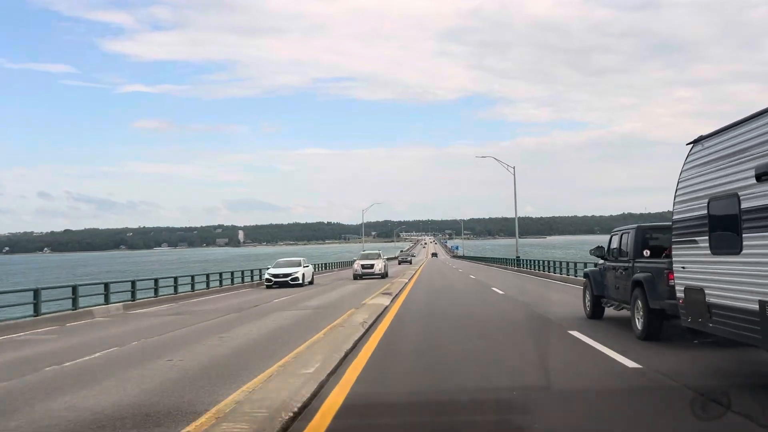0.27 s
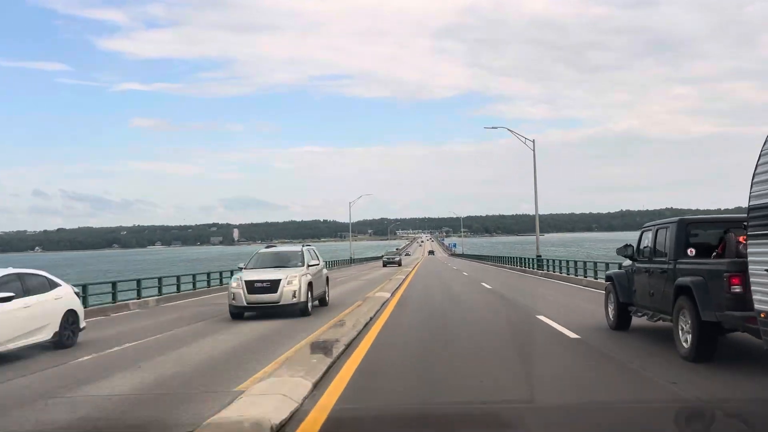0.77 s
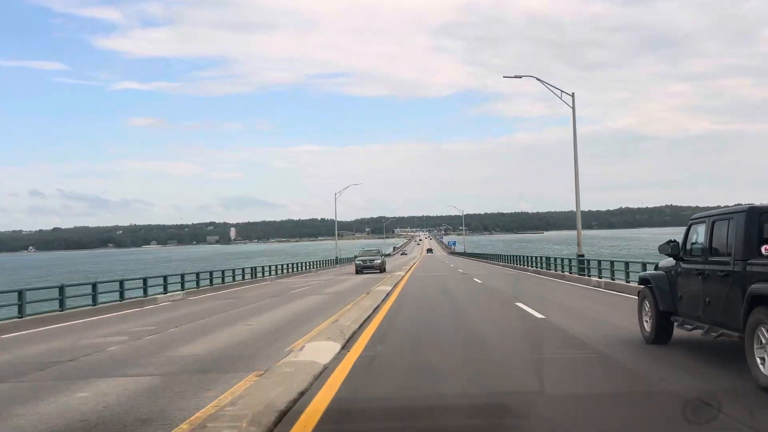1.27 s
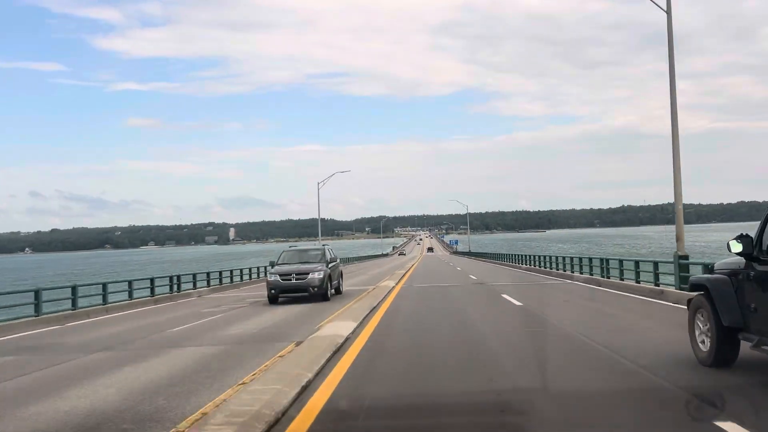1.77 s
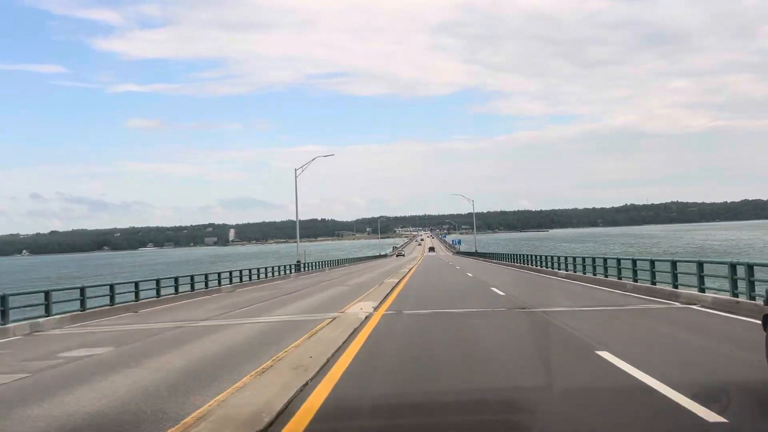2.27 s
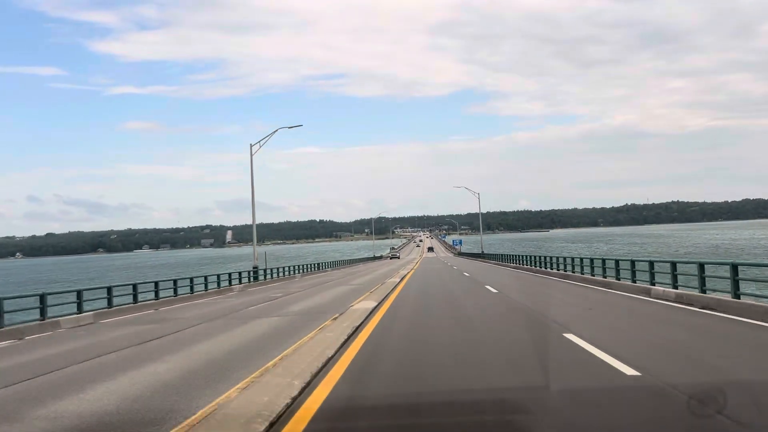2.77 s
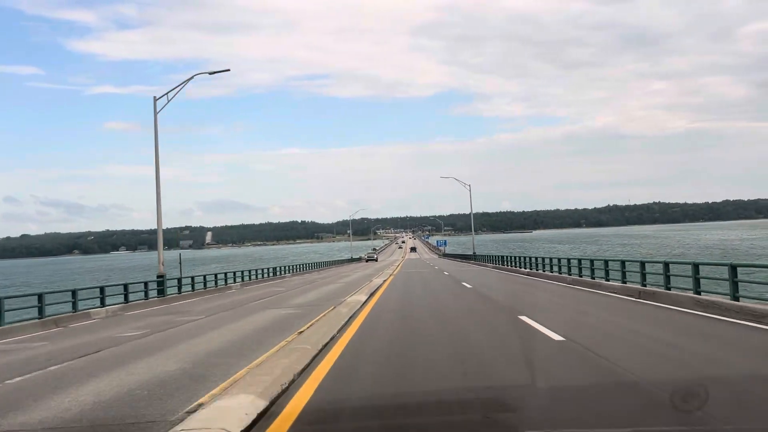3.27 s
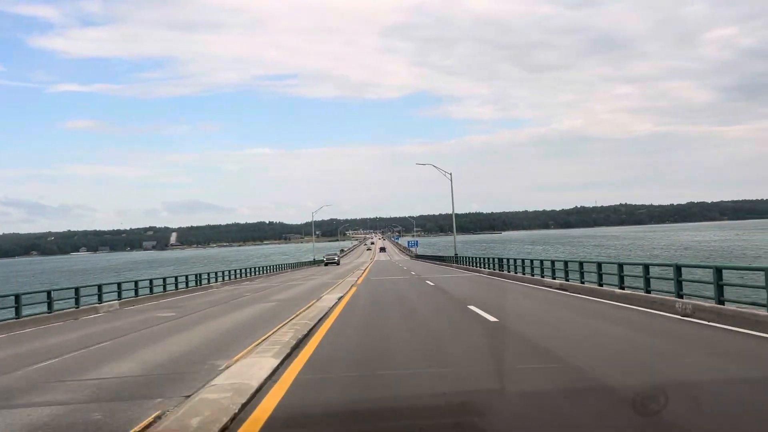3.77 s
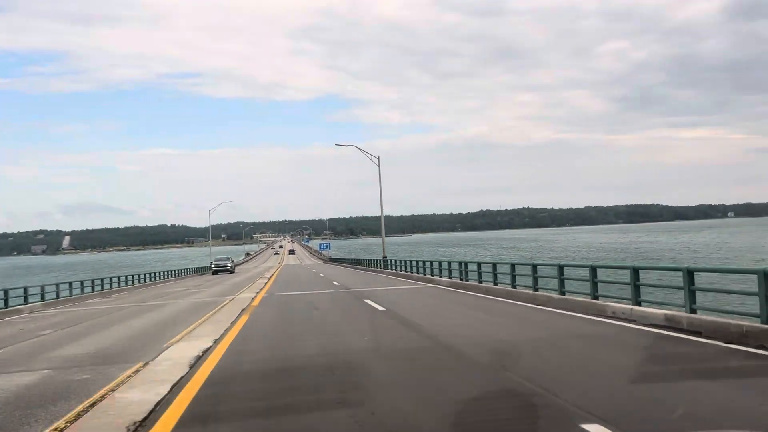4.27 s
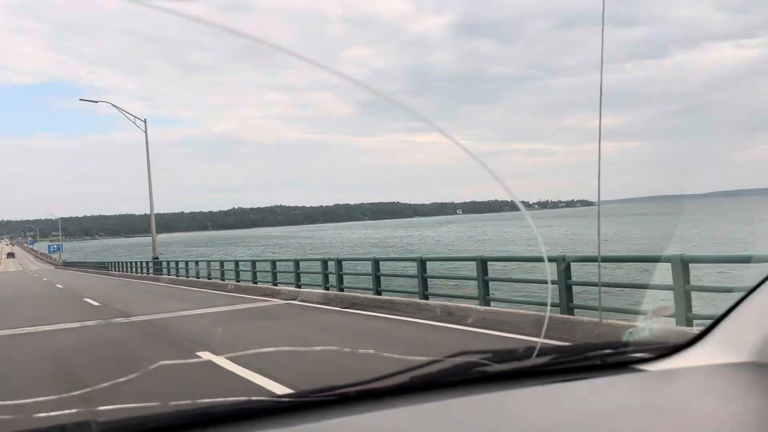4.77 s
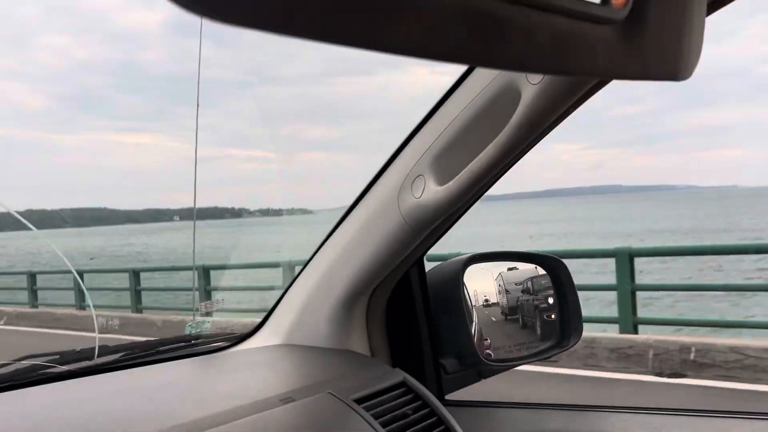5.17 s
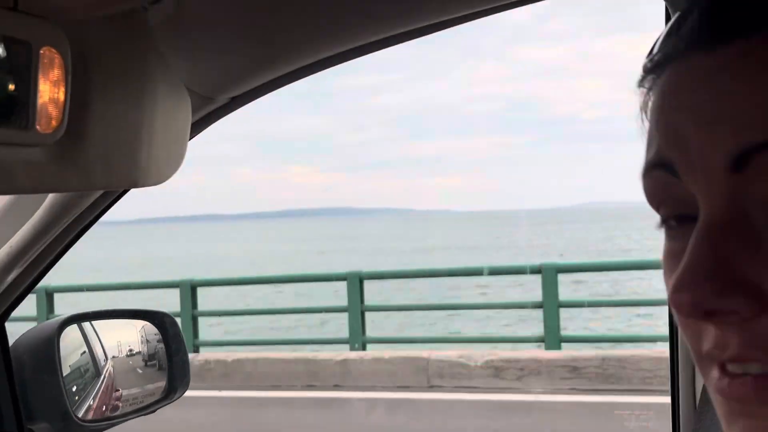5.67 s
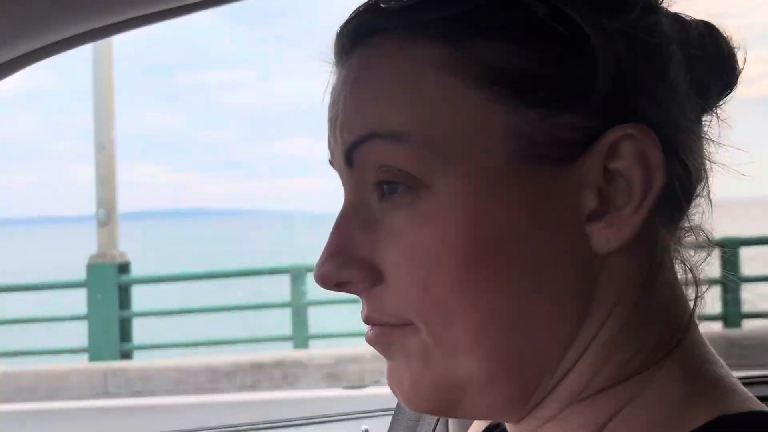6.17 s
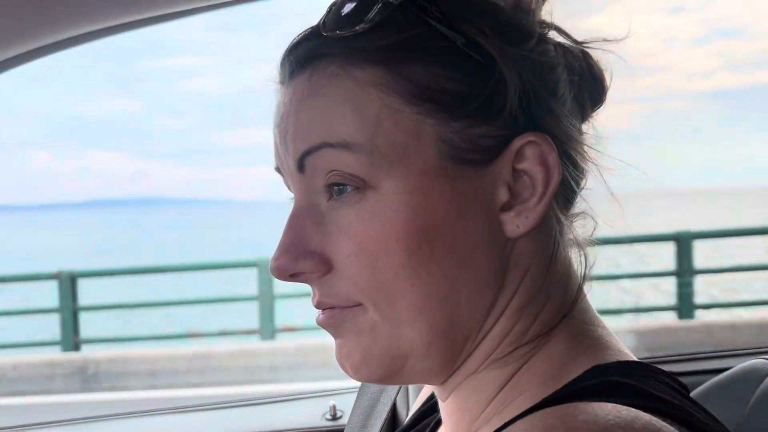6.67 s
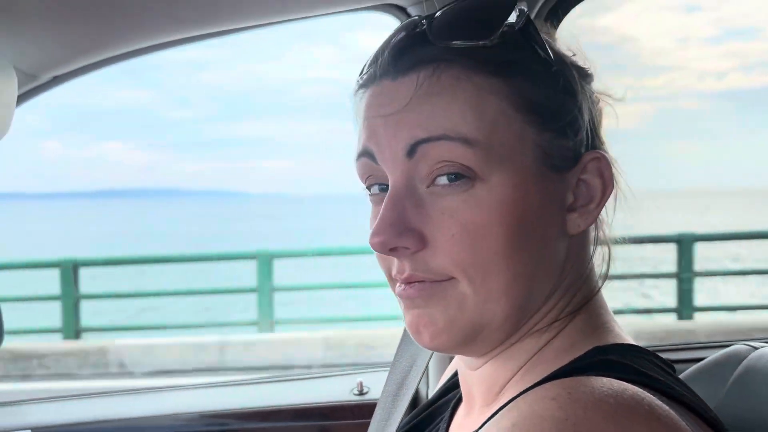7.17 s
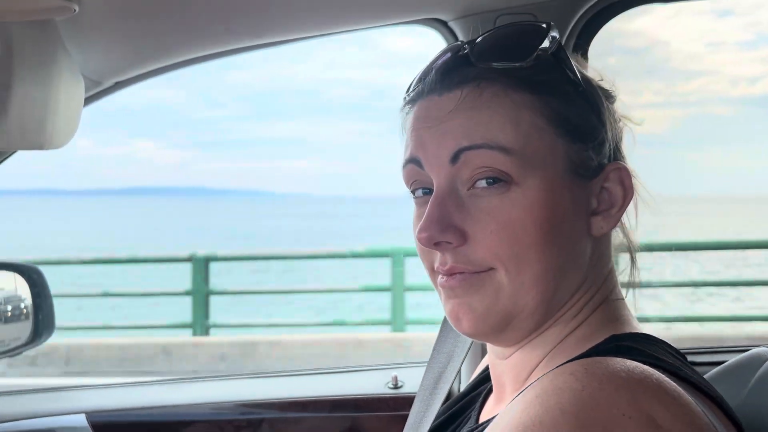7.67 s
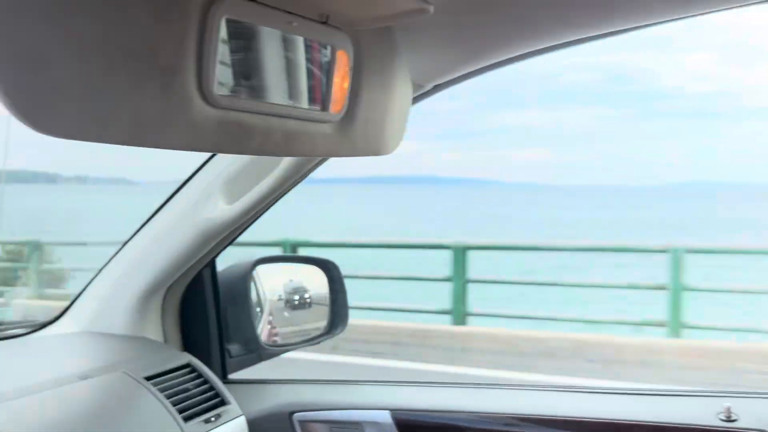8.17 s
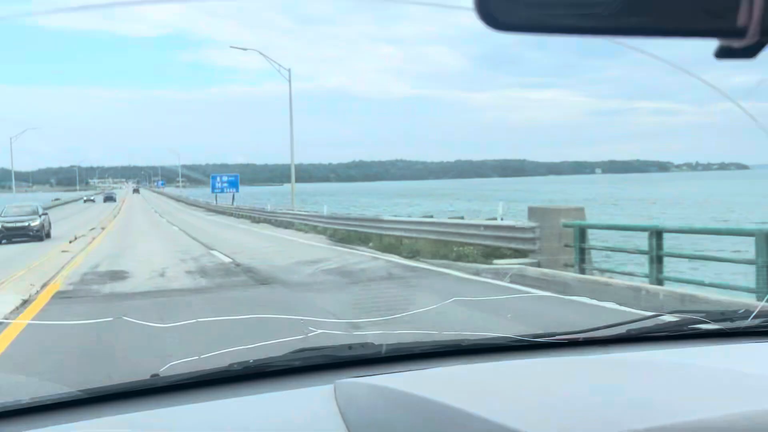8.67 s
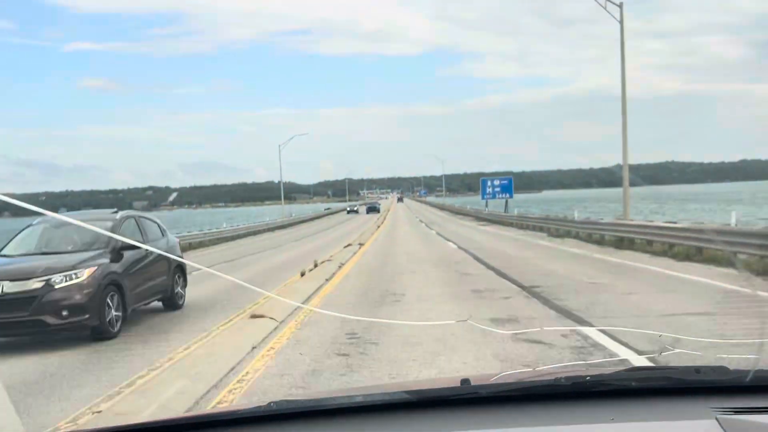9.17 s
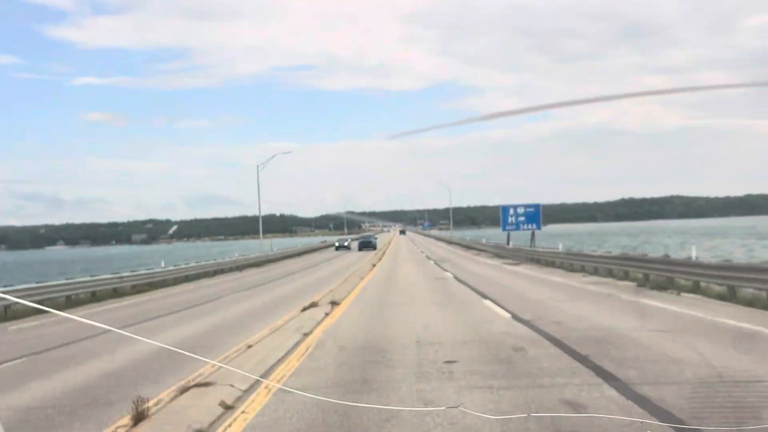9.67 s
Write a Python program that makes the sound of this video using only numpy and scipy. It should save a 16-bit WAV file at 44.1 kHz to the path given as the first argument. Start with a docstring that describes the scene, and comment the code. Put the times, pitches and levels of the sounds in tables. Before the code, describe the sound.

Heard inside a moving car on a bridge: a continuous deep boom and tyre roar with soft hiss and faint wind. Quick double thumps mark deck joints about every two and a half seconds, with slight panel rattle. Oncoming cars swish past early, midway and near the end. The hand-held phone turns into the cabin midway, where the roar eases and trim ticks, then turns partly back before a cluster of rough bumps.

```python
"""Inside a car crossing a long bridge at steady speed, heard by a hand-held phone with two microphone ports.
From the start the road shakes the body into a boom, tyres roar and hiss, and wind rushes at the glass, all as
coloured noise; both axles thump as damped modes over four deck joints, oncoming cars swish past as swells of
noise, and bands of noise, some broad, briefly swell and fade. Midway the phone turns from the windscreen to the
cabin and trim ticks; later it turns partly back, and near the end rough patches thump close together."""
import sys
import numpy as np
from scipy import signal
from scipy.fft import rfft, irfft, next_fast_len
from scipy.io import wavfile
from scipy.ndimage import uniform_filter1d, map_coordinates

SR = 44100
rng = np.random.default_rng(int(sys.argv[2]) if len(sys.argv) > 2 else 0)


def inscribe(sig):
    """Save sig as 16-bit PCM at rate SR to the path in sys.argv[1].

    A 1-D sig is mono; a 2-D sig holds one channel per row.
    Samples are clipped to [-1, 1] before scaling.
    """
    pcm = np.round(np.clip(np.atleast_2d(sig).T, -1, 1) * 32767)
    wavfile.write(sys.argv[1], SR, pcm.astype(np.int16))


N = 437031


def amp(db):
    """Decibels to an amplitude ratio."""
    return 10 ** (np.asarray(db) / 20)


def unit(x):
    """Scaling to a root mean square of 1."""
    return x / np.sqrt(np.mean(x ** 2) + 1e-20)


def along(points, hz):
    """Columns of (Hz, value, ..) rows interpolated on a log frequency axis."""
    f, *cols = np.transpose(points)
    return np.squeeze([np.interp(np.log(hz + 1), np.log(f + 1), c) for c in cols])


def curves(rows):
    """Linear interpolation in time: one value per sample for each column after the time."""
    s, *cols = np.transpose(rows)
    return [np.interp(np.arange(N) / SR, s, c) for c in cols]


def wobble(rate):
    """A smooth random curve through rate knots a second."""
    knots = rng.standard_normal(int(N * rate / SR) + 4)
    return map_coordinates(knots, [np.arange(N) * rate / SR])


def filtered(x, response):
    """Linear filtering: the spectrum of x times a response of frequency."""
    n = x.shape[-1]
    m = next_fast_len(n + 8192)
    return irfft(rfft(x, m) * response(np.fft.rfftfreq(m, 1 / SR)), m)[..., :n]


def place(out, sound, s):
    """Superposition: a sound is added from s seconds on."""
    out[:, round(s * SR):][:, :sound.shape[-1]] += sound


def rush(spectrum, size=N, tilt_db=0):
    """Two unrelated noises of one colour, rms 1: the direct field and the scattered one."""
    def colour(hz):
        return amp(along(spectrum, hz) + tilt_db * np.log2((hz + 1) / 1000))
    return unit(filtered(rng.standard_normal((2, size)), colour))


def ring(modes, t, rise, tilt_db=0, pitch=1):
    """Damped modes at slightly random strengths and pitches, swelling in over rise seconds."""
    t = np.maximum(t, 0)
    total = 0
    for hz, db, t60 in modes:
        # the tilt, in dB per octave, pivots on the second mode
        level_db = db + tilt_db * np.log2(hz / modes[1][0]) + rng.normal(0, 0.3)
        heard_hz = pitch * hz * rng.normal(1, 0.029)
        total = total + amp(level_db - 60 * t / t60) * np.sin(2 * np.pi * heard_hz * t)
    return total * (1 - np.exp(-t / rise))


def road():
    """Broadband excitation: road texture drives body, tyres and tread; its grain and gusts make levels flutter."""
    # What reaches the phone. Each row: time in seconds, then levels in dB of tyre roar, wind, deep boom,
    # tread hiss and floor drone.
    levels = [(0.0, -22.5, -42.5, -18.5, -37, -21.5), (0.5, -21, -41, -24.5, -36, -20),
              (0.88, -22.5, -40, -17, -35.5, -21.5), (1.24, -21.5, -42, -19.5, -37, -25),
              (1.6, -22, -40.5, -18.5, -36, -23), (2.01, -21.5, -41.5, -19.5, -36, -24),
              (3.12, -24.5, -43, -22, -39, -24), (3.97, -24, -44, -19, -39, -26),
              (4.55, -24.5, -44.5, -21, -37.5, -27.5), (4.97, -28.5, -49, -27, -39, -25.5),
              (5.52, -27, -51.5, -22.5, -39, -23.5), (6.29, -29, -52.5, -25.5, -40.5, -24.5),
              (7.31, -28.5, -52, -24, -39, -24.5), (7.62, -28, -51, -26, -37.5, -24.5),
              (7.86, -27, -50.5, -28, -37.5, -22), (8.09, -26.5, -50.5, -24, -39, -20.5),
              (8.58, -26.5, -45, -32, -35.5, -20.5), (9.24, -24, -46, -21.5, -38.5, -20.5),
              (9.91, -24, -46, -22, -36.5, -26)]
    # Colours of the five noises. Each row: frequency in Hz, relative spectral density in dB.
    boom_colour = [(15, -48), (24, -21), (32, -21.5), (42, 2.5), (55, -0.5), (70, -2), (100, -27),
                   (200, -71)]
    drone_colour = [(30, -41.5), (55, -6.5), (78, -0.5), (95, -2.5), (118, -2.5), (140, -12.5), (200, -31),
                    (400, -66.5)]
    roar_colour = [(60, -52), (110, -10), (150, 0), (190, -1), (250, -4.5), (370, -9.5), (550, -11),
                   (800, -15.5), (1200, -22.5), (2000, -50.5), (5000, -72)]
    tread_colour = [(300, -46), (600, -18), (1000, -2), (1500, 1.5), (2100, -2.5), (2700, -7.5),
                    (3300, -16.5), (4500, -33.5), (9000, -41.5)]
    wind_colour = [(1200, -40), (2500, 4.5), (3500, 0.5), (4500, -2.5), (5800, -1), (6700, -6.5),
                   (8000, -7.5), (10000, -10.5), (13000, -11), (16000, -16)]
    swell_db, swell_rate = 0.87, 4.9  # slow random swell of boom and drone: depth in dB, knots a second
    roar_db, wind_db, boom_db, tread_db, drone_db = curves(levels)
    grain, gust = wobble(18), wobble(8)
    boom = amp(boom_db + swell_db * wobble(swell_rate)) * rush(boom_colour)
    drone = amp(drone_db + swell_db * wobble(swell_rate)) * rush(drone_colour)
    roar = amp(roar_db + 0.92 * grain) * rush(roar_colour)
    tread = amp(tread_db + 0.34 * grain + 0.47 * gust) * rush(tread_colour)
    wind_db = wind_db + 0.31 * grain + 0.37 * wobble(24) + 0.28 * gust
    return boom + drone + roar + tread + amp(wind_db) * rush(wind_colour)


def clack(db, scuff_db, t):
    """Dry contact of tread on an edge: impact modes make a solid knock, friction a short scuff."""
    # Steel lip of a joint. Each row: frequency in Hz, level in dB, 60 dB decay time in seconds.
    edge_modes = [(528, -3.5, 0.022), (804, -4.5, 0.066), (1200, -3, 0.024), (1530, 1.5, 0.021),
                  (2100, -3, .02)]
    # Colour of the scuff. Each row: frequency in Hz, relative spectral density in dB.
    scuff_colour = [(200, -25.5), (420, -1.5), (700, 0), (1300, 5), (2300, -6), (3000, -20), (8000, -45)]
    scuff = amp(scuff_db - 60 * t / 0.1) * (1 - np.exp(-t / 0.003)) * rush(scuff_colour, size=len(t))
    knock = ring(edge_modes, t, rise=0.00067) * [[1], [.4]]  # direct, scattered
    return amp(db) * (knock + scuff)


def rattle(db, t):
    """Repeated loose contact: panels and trim buzz on, in uneven grains, after a blow."""
    # Trim shaken by a joint. Each row: frequency in Hz, relative spectral density in dB.
    trim_colour = [(150, -29.5), (300, 1), (500, 4.5), (800, -1.5), (1300, -16), (2200, -21.5), (4000, -38)]
    rise_s, t60_s = .025, 0.4
    grain_db = 3.5 * wobble(91)[:len(t)]
    envelope = amp(db + grain_db - 60 * t / t60_s) * (1 - np.exp(-t / rise_s))
    return envelope * rush(trim_colour, size=len(t))


def wheel_blow(t, slap_db, thump_db, shudder_db, clack_db, stiff_db, lag, pitch, scuff_db):
    """Delayed transmission: the tyre slaps; the blow climbs the suspension into floor and cabin air."""
    # Three sets of modes. Each row: frequency in Hz, level in dB, 60 dB decay time in seconds.
    slap_modes = [(210.3, 1.5, 0.073), (268, -2.5, 0.039), (439, -9.5, 0.065)]  # air in the tyre and wheel arch
    thump_modes = [(76.5, 9, 0.21), (95, -6.5, 0.15), (123.7, -1, 0.15)]  # floor pan
    shudder_modes = [(43.6, -1.5, 0.42), (63, 1.5, 0.13)]  # cabin air and suspension
    shudder_lag_s = 0.0403  # floor to cabin air
    slap = amp(slap_db) * ring(slap_modes, t, rise=0.0031, pitch=pitch)
    thump = amp(thump_db) * ring(thump_modes, t - lag, rise=0.015, tilt_db=stiff_db)
    shudder = amp(shudder_db) * ring(shudder_modes, t - lag - shudder_lag_s, rise=0.032)
    return (slap + thump + shudder) * [[1], [.7]] + clack(clack_db, scuff_db, t)  # direct, scattered


def joints():
    """Successive impacts: each axle strikes the near lip of a deck gap, then the far one."""
    # Deck joints. Each row: front axle time in seconds, slap, front thump, rear thump, rear shudder, clack and
    # near-lip clack in dB, stiffness in dB per octave, front tyre to floor in seconds, slap pitch ratio,
    # rattle in dB, rear clack over front in dB, rear tyre to floor in seconds, scuff over clack in dB.
    crossings = [(.414, -8.5, -10.5, -12.5, -2, -31, -35, -11, 0.042, .8, -20.5, -8, 0.0044, -2.5),
                 (2.862, -6, -4, -6, -11, -22.5, -31, 6, .017, 1.01, -17.5, -4.5, 0.0028, -2),
                 (5.337, -10.5, -6.5, -10.5, -3.5, -15, -20.5, 3.5, 0.024, 1.12, -25.5, -6.5, 0.0264, -4),
                 (7.829, -10, -9.5, -8, -4.5, -29.5, -26.5, 6, 0.023, 0.99, -28, -4.5, 0.023, 4)]
    axle_gap_s, lip_gap_s = .13, 0.021  # front to rear axle; near lip to far lip
    front_shudder_db = -11  # over the front thump
    rear_slap_db, rear_stiff_db, rear_pitch = -2, 4, .9  # dB, dB per octave and ratio over the front axle
    out, t = np.zeros((2, N + SR)), np.arange(SR // 2) / SR
    for (s, slap_db, front_db, rear_db, shudder_db, clack_db, lip_db, stiff_db, lag, pitch,
         rattle_db, rear_clack_db, rear_lag, scuff_db) in crossings:
        rear_s = s + axle_gap_s
        for axle_s, axle_db in [(s, 0), (rear_s, rear_clack_db)]:
            place(out, clack(lip_db + axle_db, scuff_db, t), axle_s - lip_gap_s)
            place(out, rattle(rattle_db + axle_db / 2, t), axle_s)
        front = wheel_blow(t, slap_db, front_db, front_db + front_shudder_db, clack_db,
                           stiff_db, lag, pitch, scuff_db)
        rear = wheel_blow(t, slap_db + rear_slap_db, rear_db, shudder_db, clack_db + rear_clack_db,
                          stiff_db + rear_stiff_db, rear_lag, rear_pitch * pitch, scuff_db)
        place(out, front, s)
        place(out, rear, rear_s)
    return out[:, :N]


def patches():
    """Impact on rough road: single blows through the same modes as at the joints."""
    # Each row: time in seconds, thump in dB, shudder in dB, stiffness in dB per octave.
    rough = [(.989, -14.5, -9, -9), (1.721, -22.5, -7.5, -7), (4.239, -14.5, -24, 2), (4.39, -26, -10, -14),
             (4.77, -23.5, -9, -11), (5.2, -17, -10, 2), (6.551, -14, -12, -6), (7.401, -18.5, -8, -11),
             (9.045, -17, -8, -14), (9.11, -17.5, -14.5, -6), (9.181, -9.5, -11, 5), (9.322, -21, -14, -20)]
    slap_db, clack_db, scuff_db = -4, -24.5, -2  # slap and clack over the thump, scuff over the clack
    lag_s = .011  # tyre to floor
    out, t = np.zeros((2, N + SR)), np.arange(SR // 2) / SR
    for s, db, shudder_db, stiff_db in rough:
        blow = wheel_blow(t, db + slap_db, db, shudder_db, db + clack_db, stiff_db, lag_s, 1, scuff_db)
        place(out, blow, s)
    return out[:, :N]


def traffic():
    """Inverse-square spreading: the amplitude of each oncoming car swells and fades about its nearest moment."""
    # Oncoming cars. Each row: time abreast in seconds, level in dB, half-amplitude times in seconds coming
    # and going, brightness in dB per octave.
    cars = [(.92, -32, 0.2, 0.24, -5.5), (1.15, -28, 0.17, 0.1, 1.1), (2.25, -30.5, 0.13, 0.1, 1.5),
            (5.8, -36.5, 0.14, 0.23, -1), (9.4, -29.5, 0.2, 0.14, -0.8)]
    # Colour of a passing car. Each row: frequency in Hz, relative spectral density in dB.
    swish_colour = [(200, -32), (500, -3.5), (900, 6), (1400, 4), (2000, -3), (3300, -13), (5800, -19),
                    (7000, -21), (16000, -32.5)]
    out, t = np.zeros((2, N + 2 * SR)), np.arange(-SR, SR) / SR  # out starts 1 s early
    for s, db, coming, going, tilt_db in cars:
        near = 1 / (1 + (t / np.where(t < 0, coming, going)) ** 2)
        place(out, amp(db) * near * rush(swish_colour, size=2 * SR, tilt_db=tilt_db), s)
    return out[:, SR:SR + N]


def noise_bands():
    """Band-pass filtering: bands of noise, some broad, briefly swell, flutter and fade."""
    # Each row: centre time in seconds, Gaussian fade in seconds, centre in Hz, half-amplitude width in Hz,
    # level in dB.
    bands = [(1.15, .08, 764, 200, -31), (2.25, 0.15, 805, 200, -33.5), (2.26, 0.062, 2100, 1200, -40.5),
             (3.1, .4, 680, 300, -37), (5.53, 0.13, 1490, 400, -38), (5.77, 0.063, 1600, 600, -35),
             (5.85, 0.12, 680, 448, -34.5), (5.9, .09, 1170, 500, -39), (9.18, 0.09, 1120, 503, -34.5),
             (9.31, 0.078, 1500, 700, -34.5), (9.4, 0.037, 2340, 1490, -42), (9.48, 0.11, 1290, 604, -31),
             (9.7, 0.25, 1500, 600, -36)]
    t, out = np.arange(N) / SR, np.zeros((2, N))
    for s, fade, hz, width, db in bands:
        noise = rng.standard_normal((2, N))
        band = unit(filtered(noise, lambda f: 1 / (1 + ((f - hz) / width * 2) ** 2)))
        out += amp(db) * np.exp(-((t - s) / fade) ** 2 / 2) * band
    return amp(2 * wobble(35)) * out


def ticks():
    """Impulsive excitation: loose trim gives a hollow modal knock with a short burst of white noise."""
    # Loose trim knocks. Each row: time in seconds, knock in dB, tick in dB.
    knocks = [(5.762, -27, -36), (5.797, -23.5, -43.5), (5.859, -21, -43.5)]
    # Modes of the trim. Each row: frequency in Hz, level in dB, 60 dB decay time in seconds.
    trim_modes = [(686, 6, 0.063), (1180, -8, 0.03)]
    out, t = np.zeros((2, N)), np.arange(SR // 10) / SR
    for s, knock_db, tick_db in knocks:
        tick = amp(tick_db - 60 * t / 0.045) * rng.standard_normal((2, len(t)))
        place(out, amp(knock_db) * ring(trim_modes, t, rise=0.0076) + tick, s)
    return out


def standing(hz, shape, depth_db):
    """Standing waves in the cabin: drifting and fluttering peaks and dips, weaker towards the bass."""
    def smooth(bins, frames):
        field = uniform_filter1d(rng.standard_normal(shape), size=bins, axis=-2)
        return unit(uniform_filter1d(field, size=frames, axis=-1))
    drift, flutter = smooth(3, 22), smooth(24, 3)
    return amp(hz[:, None] / (hz[:, None] + 250) * (depth_db * drift + 1.65 * flutter))


def ports(steady, blows):
    """Coherence and phase lag: the right port hears the direct field late, mixed with scattered sound."""
    # The two ports. Each row: frequency in Hz, likeness (0 to 1) facing the road, likeness facing the cabin,
    # lag of the right port in radians, left over right in dB.
    port_rows = [(28, 0.97, 0.92, .02, -1.5), (45, 0.95, 1, .05, -2), (75, 1, 1, 0.093, 4.5),
                 (109, 0.65, 0.93, 0.28, -1), (159, 1, 0.75, 0.41, 5), (258, 0.82, 1, 1.15, 1),
                 (374, 0.52, 0.42, 1.17, 2), (493, 0.7, 1, 2.4, 2.5), (710, 0.88, 0.57, 2.59, 2.5),
                 (1100, 0.61, 0.21, 3.22, 3.5), (1670, 0.8, 0.4, 4.02, -1.1), (2200, 0.39, 0.42, 3.92, 2),
                 (2660, 0.4, 0.2, 4.93, 1.5), (3200, 0.66, 0.29, 6.4, -0.5), (4100, 0.13, 0.47, 6.2, -1.5),
                 (4930, 0.17, 0.17, 3.6, -6), (6140, 0.11, .1, 3.6, -8.5), (6300, 0.27, .17, 2, -6.5),
                 (7630, 0.47, 0.6, 4.45, 3), (9400, 0.53, 0.9, 3.7, -1)]
    # Aim of the phone. Each row: time in seconds, turn from 0 facing the road to 1 facing the cabin.
    aim = [(0, 0.055), (4.4, 0.069), (5.2, 0.72), (6.2, 0.75), (7.8, 0.82), (8.6, 0.41), (9.91, 0.46)]
    # Colour facing the cabin. Each row: frequency in Hz, level in dB.
    cabin_shade = [(300, 2), (600, -1.5), (1500, 1.5), (3000, 0), (5700, 8), (8500, 2), (15000, -3)]
    blows_line_up = 0.58  # share of the lag that blows lose when the phone faces the cabin
    hz, t, (steady, blows) = signal.stft(np.array([steady, blows]), SR, nperseg=2048)
    steady = steady * standing(hz, steady.shape, depth_db=1.9)
    road_like, cabin_like, lag, lean_db = along(port_rows, hz)[..., None]
    turn = np.clip(np.interp(t, *np.transpose(aim)), 0, 1)
    like = np.clip(road_like + turn * (cabin_like - road_like), 0, 1)
    shade = amp(turn * along(cabin_shade, hz)[:, None])

    def pair(x, lag):
        direct, scattered = x
        mixed = like * direct + np.sqrt(1 - like ** 2) * scattered
        left = direct * amp(lean_db / 2) * np.exp(.5j * lag)
        right = mixed * amp(-lean_db / 2) * np.exp(-.5j * lag)
        return np.array([left, right])

    heard = pair(steady, lag) + pair(blows, lag * (1 - blows_line_up * turn))
    return signal.istft(shade * heard, SR, nperseg=2048)[1][:, :N]


def scene():
    """Superposition: steady sounds and blows reach the two ports."""
    return ports(road() + traffic() + noise_bands(), joints() + patches() + ticks())


def record(dry):
    """Soft saturation rounds off the loudest thumps; at the top the left-right sum fades before the difference."""
    # Top of the left + right sum. Each row: frequency in Hz, level in dB.
    sum_top = [(8800, 1.5), (9400, 1), (9800, -11.5), (10400, -26), (10800, -63.5)]
    top_hz = 15800  # upper limit of the difference
    soft = dry / (1 + np.abs(dry / .8) ** 6) ** (1 / 6)
    pair = np.array([soft[0] + soft[1], soft[0] - soft[1]]) / 2
    mid, side = filtered(pair, lambda hz: np.array([amp(along(sum_top, hz)), hz < top_hz]))
    return np.array([mid + side, mid - side])


dry = scene()
out = record(dry)
inscribe(out)
```